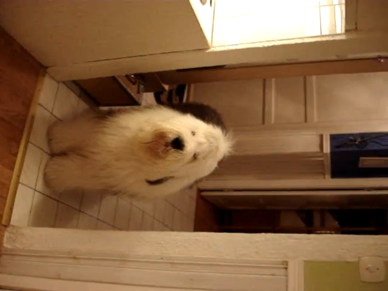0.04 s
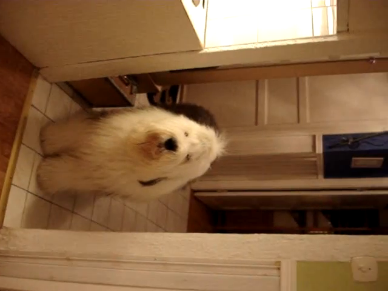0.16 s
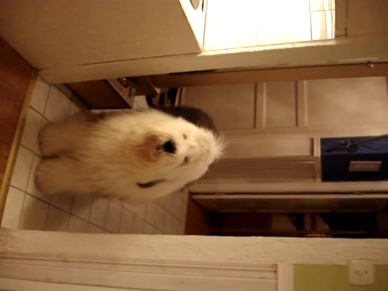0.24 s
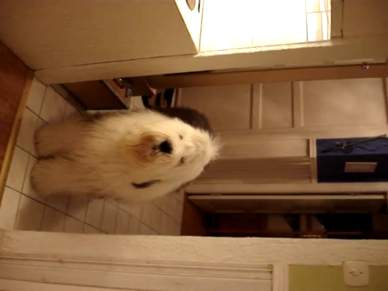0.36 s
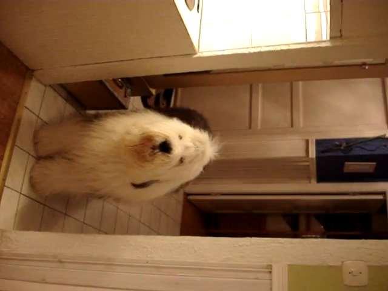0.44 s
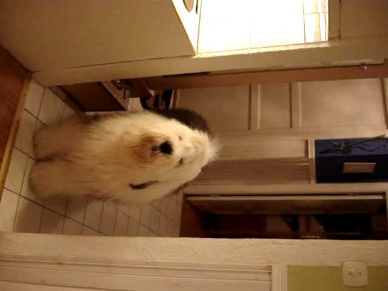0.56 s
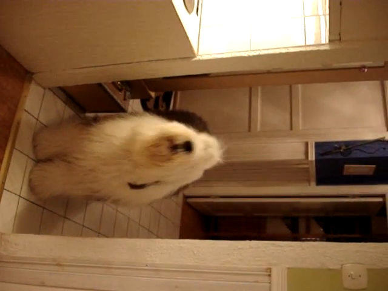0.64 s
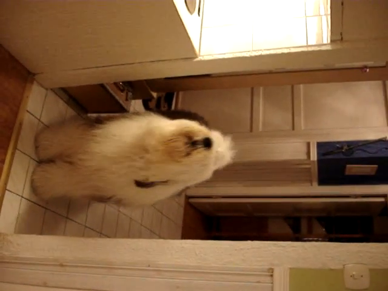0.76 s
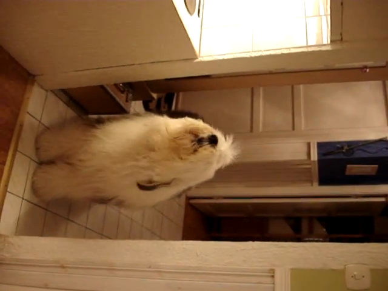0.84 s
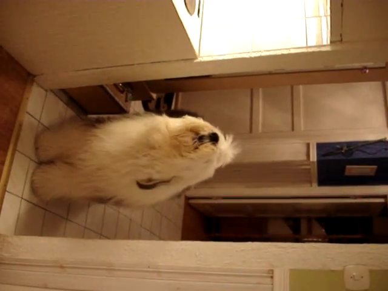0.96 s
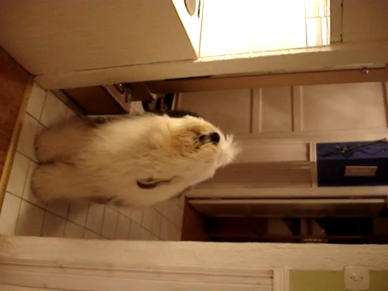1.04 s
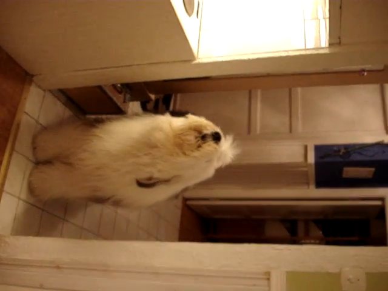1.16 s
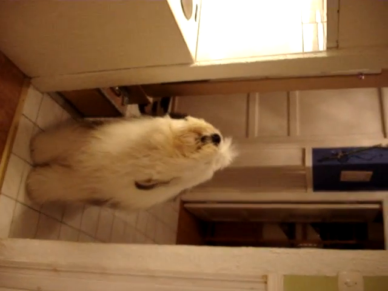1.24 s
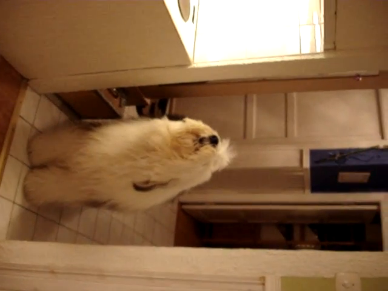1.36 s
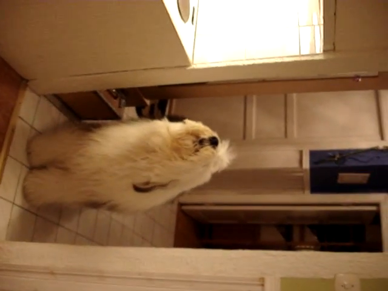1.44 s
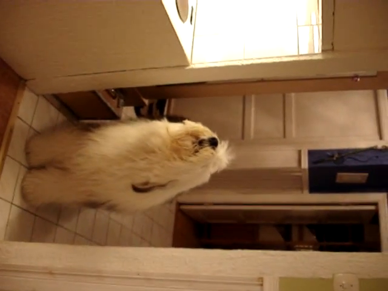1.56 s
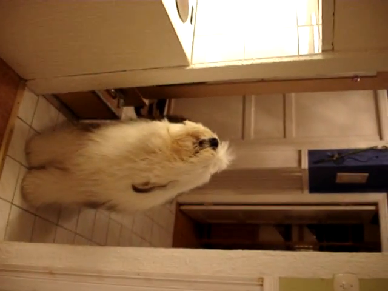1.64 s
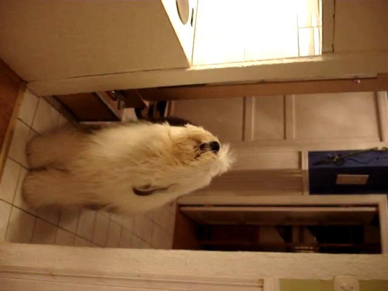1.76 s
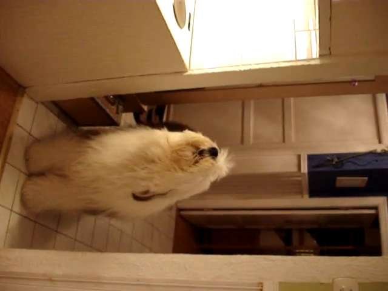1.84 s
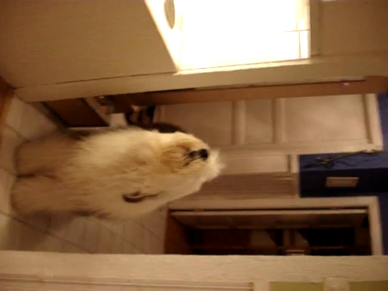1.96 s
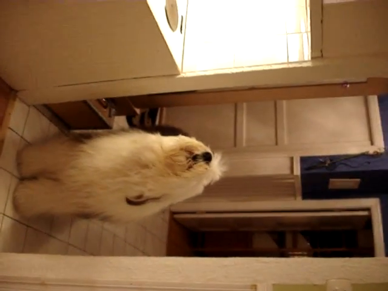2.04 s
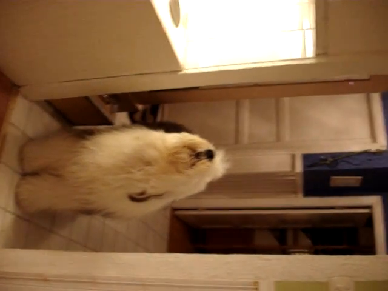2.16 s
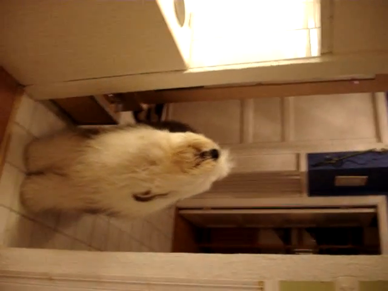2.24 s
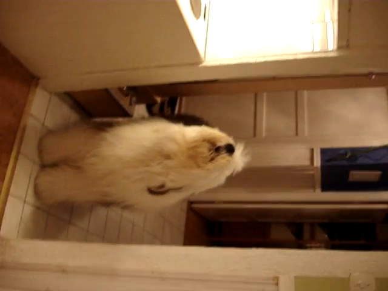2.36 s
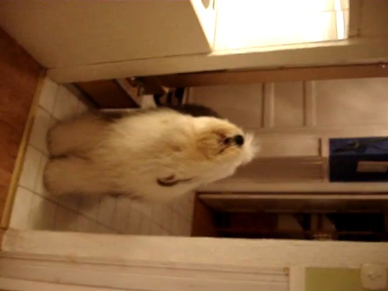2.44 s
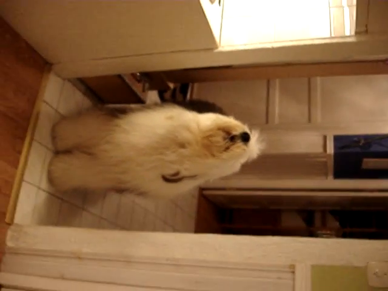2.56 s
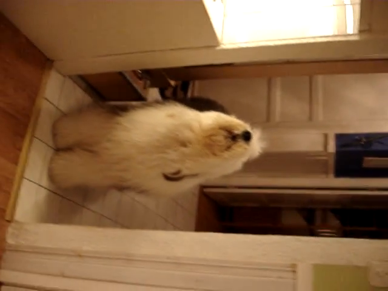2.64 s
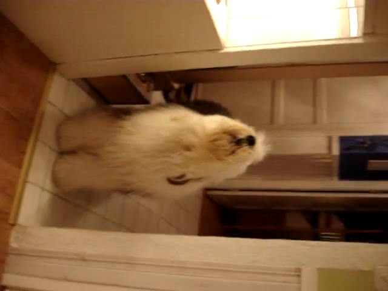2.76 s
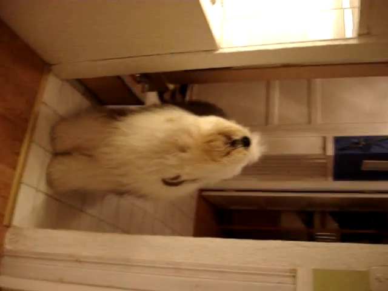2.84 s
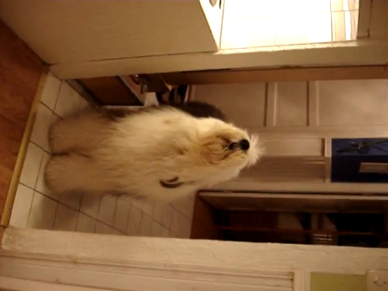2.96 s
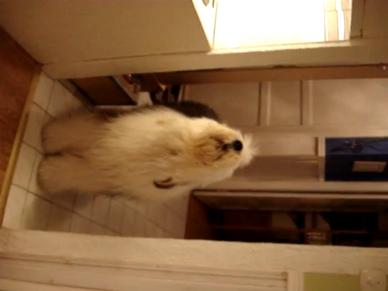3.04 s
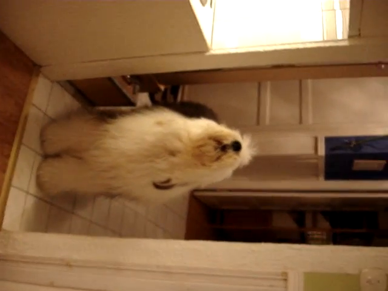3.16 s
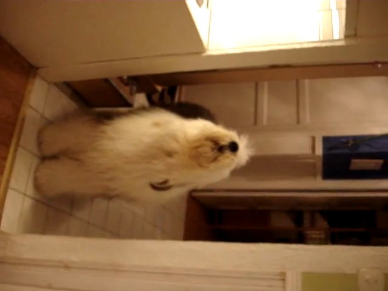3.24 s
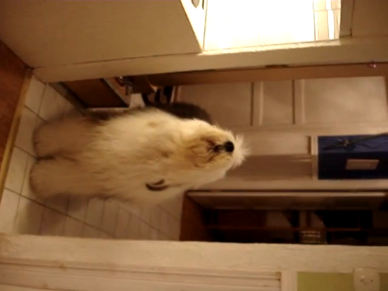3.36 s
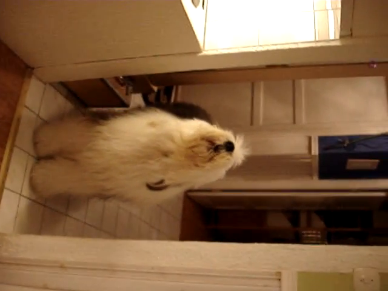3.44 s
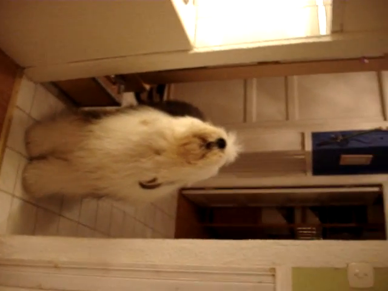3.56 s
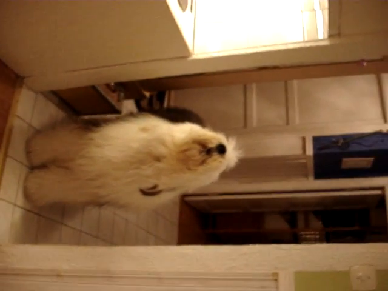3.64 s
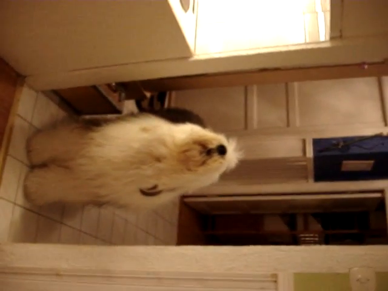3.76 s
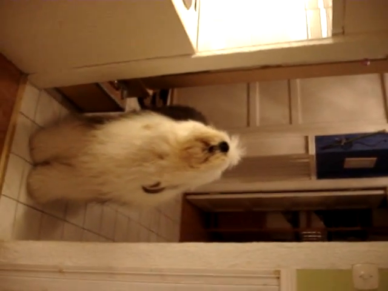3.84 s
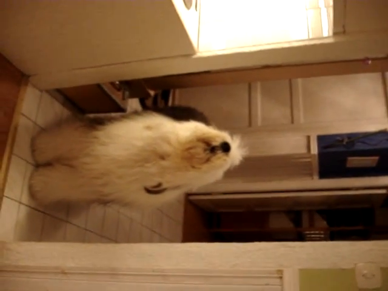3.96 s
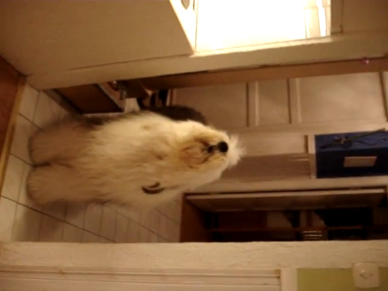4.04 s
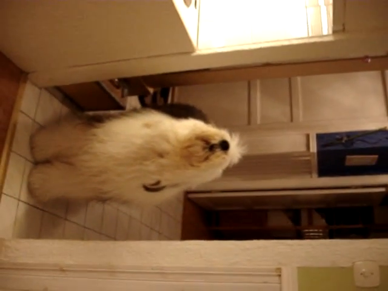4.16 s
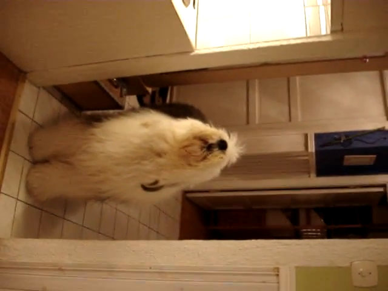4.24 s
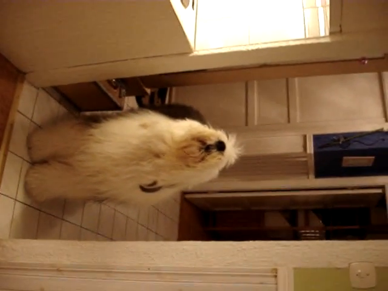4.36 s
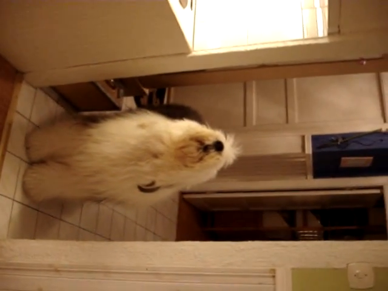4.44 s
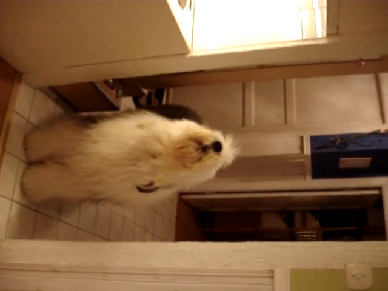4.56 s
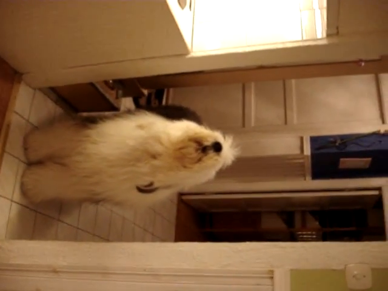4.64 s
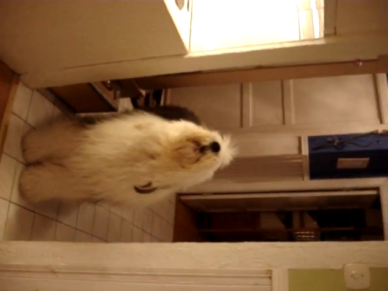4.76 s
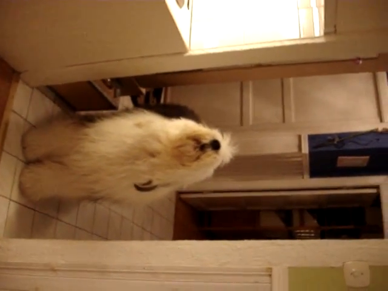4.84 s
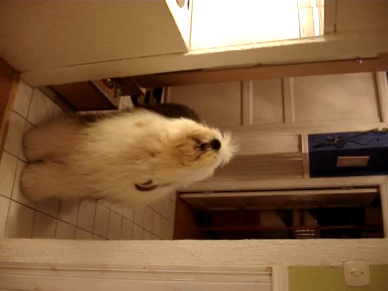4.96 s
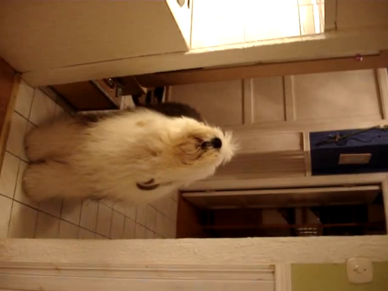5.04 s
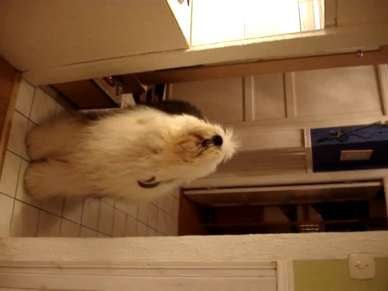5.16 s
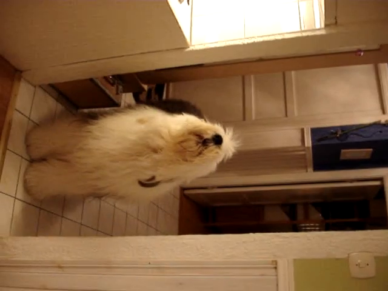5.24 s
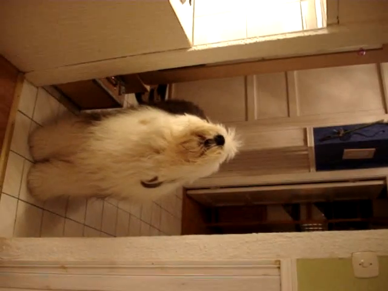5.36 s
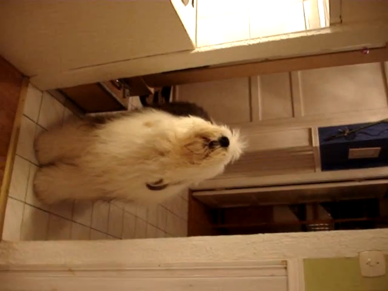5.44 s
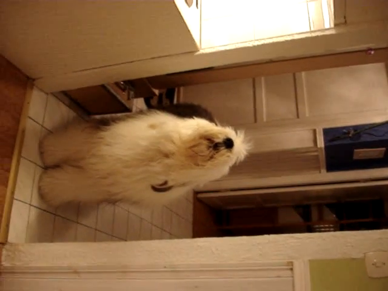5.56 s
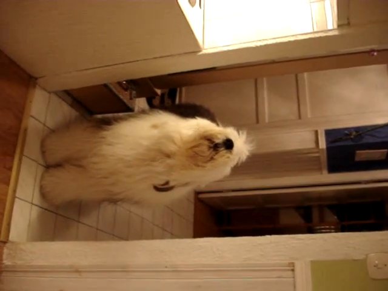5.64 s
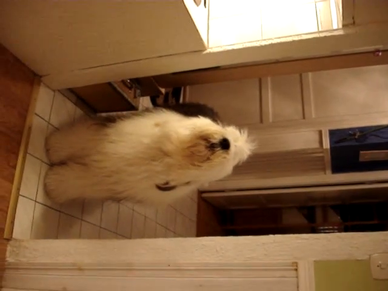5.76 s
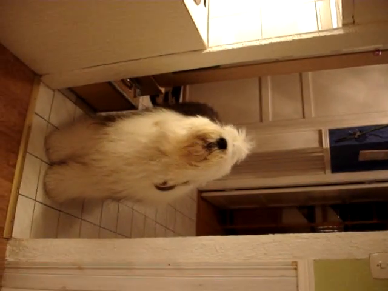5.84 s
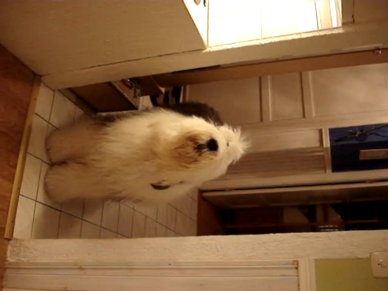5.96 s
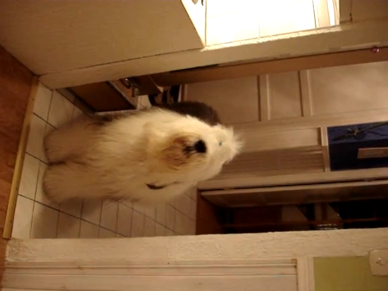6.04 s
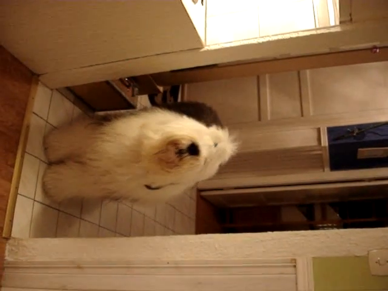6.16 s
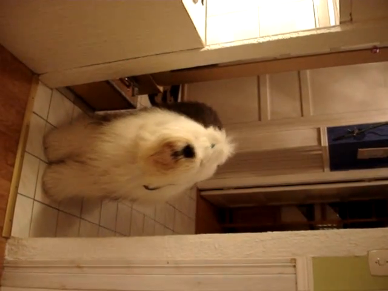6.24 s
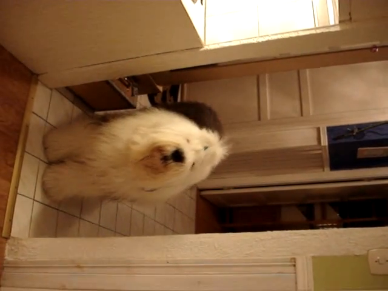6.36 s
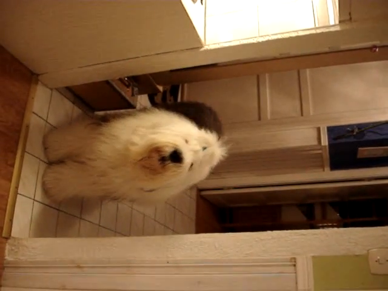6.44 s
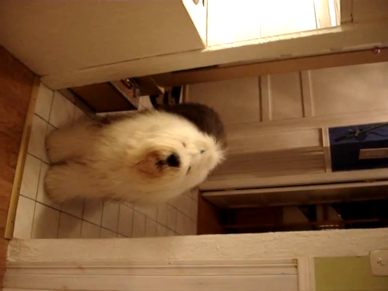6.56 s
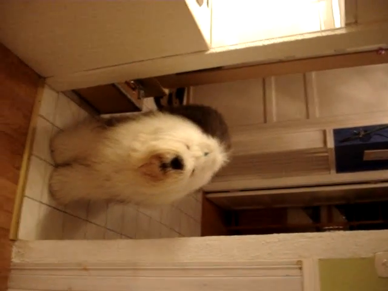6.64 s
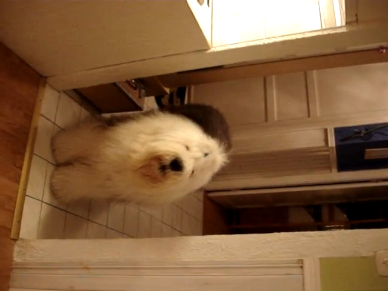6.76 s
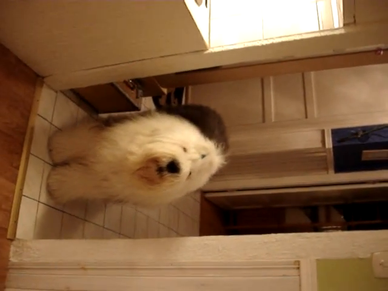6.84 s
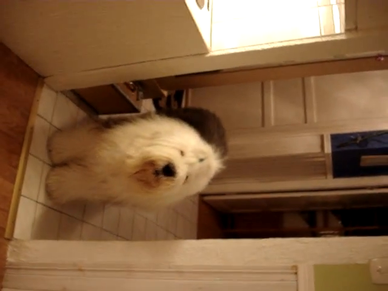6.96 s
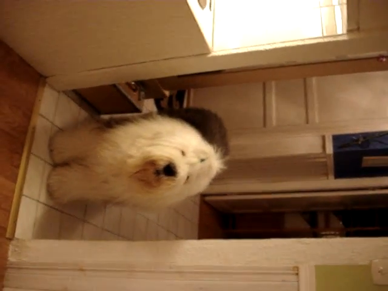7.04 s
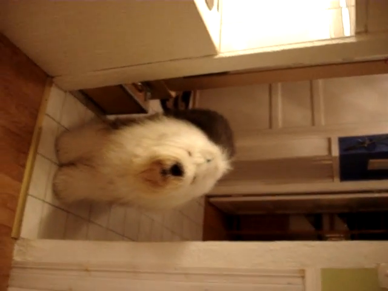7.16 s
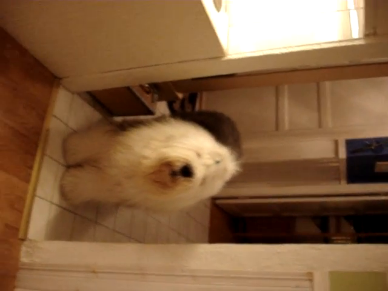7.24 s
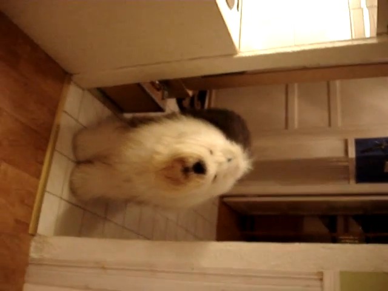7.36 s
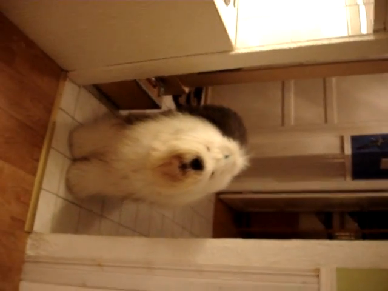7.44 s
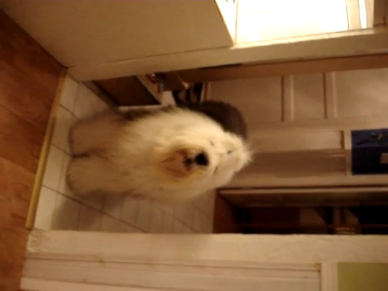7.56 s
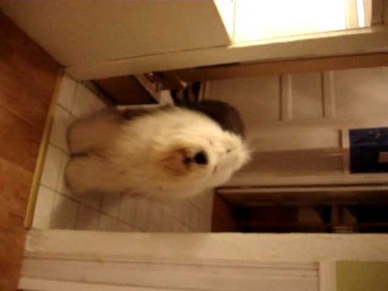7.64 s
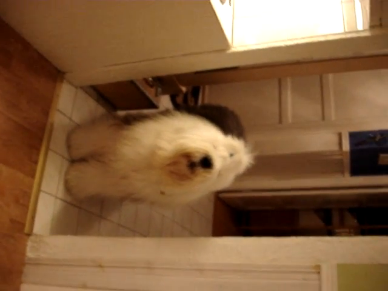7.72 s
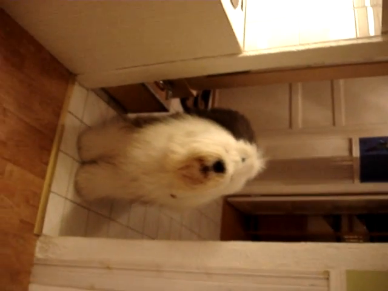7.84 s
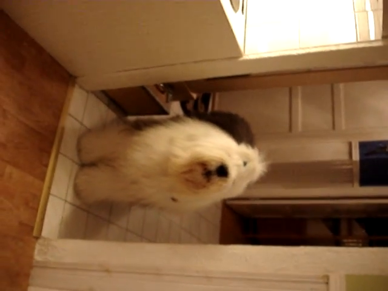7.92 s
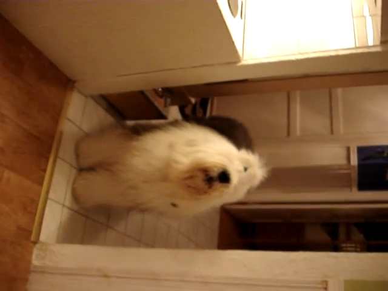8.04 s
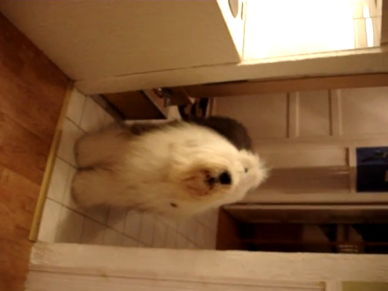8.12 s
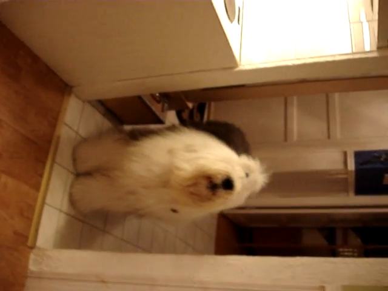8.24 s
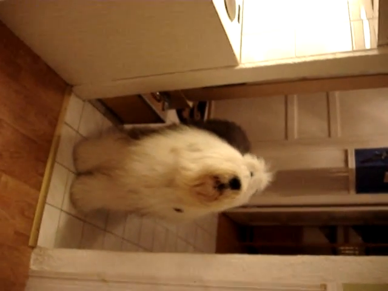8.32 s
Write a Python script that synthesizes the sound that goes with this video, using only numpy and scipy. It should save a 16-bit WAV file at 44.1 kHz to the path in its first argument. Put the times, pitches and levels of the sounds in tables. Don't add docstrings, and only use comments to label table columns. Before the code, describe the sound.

A large dog howls twice in a tiled hallway, first rough then clear and cracking, then wavering, sagging and holding until cut off.

```python
import sys
import numpy as np
from scipy import signal
from scipy.fft import rfft, irfft, next_fast_len
from scipy.io import wavfile
from scipy.ndimage import uniform_filter1d

SR = 44100
rng = np.random.default_rng(int(sys.argv[2]) if len(sys.argv) > 2 else 0)


def volts_from_db(level):
    exponent = np.asarray(level, float) / 20
    return 10 ** exponent


def digitize_waveform(pressure):
    field = np.atleast_2d(pressure).T
    bounded = np.clip(field, -1, 1)
    quanta = np.round(bounded * 32767).astype(np.int16)
    wavfile.write(sys.argv[1], SR, quanta)


N = 369999
LOCK_S, UNLOCK_S, LOCK_RATIO = 3.86, 6, 3 / 4
LOCK_TAKES_S = .04

# (f/Hz, width/Hz, level/dB)
THROAT = [(292, 31, -3.5), (556, 176, 1.5), (999.7, 121, -9.5), (1485, 98, -19), (1615.5, 64, -14),
          (2336, 124, -22.5), (3700, 43, -41.5), (3960, 75, -52), (4680, 150, -38), (5700, 370, -48.5),
          (6280, 290, -39), (8500, 250, -57), (9500, 200, -68)]


def dog():
    # (t/s, pitch f/Hz, effort level/dB, mouth opening level/dB)
    rough_howl = [(.735, 291.4, -37, 9.5), (.785, 311.6, -17.5, 7), (.84, 345, -15.5, -0.5),
                  (.9, 321.7, -15, 4), (1.12, 317, -14, 1.5), (1.35, 334.5, -16, 2), (2.1, 346.5, -15, 3.5),
                  (3.2, 337.8, -15.5, 1), (3.75, 334.6, -16, 2.5)]
    clear_howl = [(3.858, 324.8, -16.5, -4.5), (4.27, 326.5, -16, -3), (4.37, 323.7, -17.5, -3.5),
                  (4.502, 320.9, -17, -1), (4.881, 321.7, -14.5, -1), (5.27, 324.9, -17.5, -2),
                  (5.42, 318.3, -15.5, 0), (5.599, 322.8, -16.5, -4), (5.7, 328.5, -24.5, 5.5)]
    waver = [(6.625, 320.8, -49, -4), (6.644, 326.4, -13.5, 0.5), (6.691, 340.1, -12, 6),
             (6.728, 349.6, -9.5, 4.5), (6.787, 318, -14, -5), (6.849, 304.5, -14, 9),
             (6.925, 308, -13.5, 12.5)]
    sag = [(6.965, 366.1, -16.5, -10.5), (7.04, 340.6, -13, 4.5), (7.095, 324.3, -17, -3),
           (7.17, 305.2, -19.5, -12.5), (7.205, 293.7, -12, 6.5), (7.24, 296.4, -34.5, -1),
           (7.305, 294.9, -57.5, -3), (7.325, 307.2, -17.5, -10.5)]
    hold = [(7.35, 307.4, -20.5, 1.5), (7.39, 290.4, -7, -5.5), (7.461, 274.4, -12.5, -5),
            (7.52, 272.9, -13, 8), (7.6, 291.1, -6.5, -12), (7.67, 301.1, -11.5, -0.5),
            (7.96, 307.9, -13, 10), (8.241, 318.1, -11.5, -2)]
    break_off = [(8.32, 328.6, -12, 2), (8.36, 302, -16.5, -5.5), (8.39, 298.6, -14.5, -3)]
    cracks = [
        [(5.72, 398.6, -30, 29), (5.76, 421.7, -33, 5), (5.80, 396.3, -39.5, -12.5)],
        [(5.852, 299.7, -26.5, -13), (5.875, 274.4, -42, -0.5), (5.93, 251.3, -41.5, 2.5),
         (6.02, 237.4, -74.5, 0)],
    ]
    # (t/s, pitch f/Hz, own swing level/dB)
    second_fold = [
        [(.78, 285.3, -2.5), (1.0, 287.1, -11), (1.19, 277.4, -18), (1.35, 286.1, -0.5), (2.6, 286.7, 1.5),
         (2.9, 280.9, -17), (3.25, 275.8, -16), (3.7, 270.5, -14.5), (4.28, 244, -9)],
        [(8.3, 298, -7.5), (8.34, 275.4, -1), (8.38, 284, -3)],
    ]

    phrases = [rough_howl + clear_howl, waver + sag + hold + break_off] + cracks
    pitch, effort_db, mouth_db, gate = voiced(phrases, attack_s=.006, release_s=.03)
    pitch2, swing_db, gate2 = voiced(second_fold, attack_s=.03, release_s=.06)
    first_db, over_db, rasp_db, second_db = levels(pitch, effort_db, mouth_db, swing_db)
    _, octave2_db, sum_db, _ = second_db

    locked = (np.arange(N) > LOCK_S * SR) & (np.arange(N) < UNLOCK_S * SR)
    grip = uniform_filter1d(1. * locked, size=int(LOCK_TAKES_S * SR))
    coupling = gate2 * np.clip(volts_from_db(np.maximum(sum_db, octave2_db) + 17.5), 0, 1)
    free = coupling * uniform_filter1d(1. * ~locked, size=int(LOCK_TAKES_S * SR))

    glide_rounding_s = .035
    pitch = uniform_filter1d(pitch, size=int(glide_rounding_s * SR))
    glide_hz_per_s = np.gradient(pitch) * SR
    pitch = pitch + (.3 + .7 * free) * wobble(12)
    pitch2 = np.where(locked, LOCK_RATIO * pitch, pitch2 + .8 * wobble(12))
    one, two = 2 * np.pi * np.cumsum([pitch, pitch2], axis=1) / SR

    tones = fold_tones(one, two, first_db, second_db, gate2, free)
    tones += combination_tones(one, two, coupling, grip)
    over = volts_from_db(over_db) * overtones(one, two, coupling, glide_hz_per_s)
    return gate * (np.sqrt(2) * tones + over + volts_from_db(rasp_db) * rasp(one, coupling))


def voiced(tables, attack_s, release_s):
    t = np.arange(N) / SR
    s, *columns = np.transpose(sorted(tuple(row) for table in tables for row in table))
    edges = []
    for table in tables:
        opening = (t - table[0][0]) / attack_s
        closing = 1 + (table[-1][0] - t) / release_s
        edges.append(np.minimum(opening, closing))
    gate = np.clip(np.max(edges, axis=0), 0, 1)
    return [np.interp(t, s, c) for c in columns] + [gate]


def levels(pitch, effort_db, mouth_db, swing_db):
    # (from t/s, tone level/dB, octave level/dB, overtones level/dB, rasp level/dB)
    registers = [(0, -4.5, -4, -13, -3.5), (.88, -6.5, -15.5, -18, -11), (3.55, -6, -15, -14.5, -10.5),
                 (3.81, -0.5, -17, -13, -18), (3.95, -2, -14.5, -12.5, -25), (4.37, 2.5, -8.5, -9.5, -29.5),
                 (5.69, 4.5, -13, -14, -9), (5.83, 2, -7, -32, -21), (6.2, -1, -10, -16, -23),
                 (7.3, -0.5, -11.5, -19.5, -29), (7.62, -1, -8, -16, -29)]
    # (from t/s, tone level/dB, octave level/dB, sum tone level/dB, upper beat tone level/dB)
    second_registers = [
        (0, -1, -2.5, -5, -18.5),
        (.85, -4, -0.5, -8.5, -18),
        (3.81, -7.5, -35, -5.5, -6.5),
        (6.2, -8, -4.5, -21, -6),
    ]

    tone, octave, over, rasp_db = effort_db + register(registers)
    tone2, octave2, both, beat = effort_db + register(second_registers)
    free = np.clip((LOCK_S - np.arange(N) / SR) / LOCK_TAKES_S, 0, 1)
    sway_db, sway_hz = 2, 2.2
    sway = [sway_db * free * wobble(sway_hz) for k in range(6)]

    tone += detuned_db(pitch, 336.4, 150) + sway[0]
    octave += mouth_db + detuned_db(2 * pitch, 627.4, 68) + sway[1]
    over += 0.083 * mouth_db + sway[2]
    tone2 += swing_db
    octave2 += 0.3 * swing_db + sway[3]
    both += -0.32 * swing_db + sway[4]
    beat += 0.11 * swing_db + sway[5]
    return (tone, octave), over, rasp_db, (tone2, octave2, both, beat)


def register(rows):
    change_s = 0.036
    s, *columns = np.transpose(rows)
    held = np.array(columns)[:, np.searchsorted(s, np.arange(N) / SR, "right") - 1]
    return uniform_filter1d(held, size=int(change_s * SR), axis=1)


def detuned_db(hz, peak_hz, width_hz):
    return -10 * np.log10(1 + (2 * (hz - peak_hz) / width_hz) ** 2)


def fold_tones(one, two, first_db, second_db, gate2, free):
    tone_db, octave_db = first_db
    tone2_db, octave2_db, sum_db, beat_db = second_db
    shimmer = [volts_from_db((.15 + 1.3 * free) * wobble(25)) for k in range(3)]
    first = volts_from_db(tone_db) * np.cos(one) * shimmer[0] * tongue(1)
    first += volts_from_db(octave_db) * tongue(2) * np.cos(2 * one + 1.2)
    second = volts_from_db(tone2_db) * np.cos(two) + volts_from_db(octave2_db) * np.cos(2 * two) * shimmer[1]
    second += volts_from_db(sum_db) * np.cos(one + two) * shimmer[2] + volts_from_db(beat_db) * np.cos(2 * one - two)
    return first + gate2 * second


def combination_tones(one, two, coupling, grip):
    multiples = [(4, -2), (4, -1), (0, 4), (-2, 5), (-1, 2), (-2, 4), (3, -2), (-1, 3), (0, 3), (1, 2),
                 (3, -1), (2, 1), (1, 3), (2, 2), (3, 1)]
    # (free level/dB, locked level/dB)
    combination_db = [(-46.5, -57), (-42.5, -60), (-46, -74.5), (-54.5, -77.5), (-48, -89), (-35.5, -89.5),
                      (-33.5, -58.5), (-34, -94.5), (-37.5, -60), (-39, -67), (-45, -33.5), (-63.5, -42),
                      (-47.5, -27), (-72, -37), (-62.5, -43.5)]
    tones = np.zeros(N)
    for (m, n), (free_db, locked_db) in zip(multiples, combination_db):
        level_db = grip * locked_db + (1 - grip) * (free_db + 3 * wobble(8.2))
        tones += coupling * volts_from_db(level_db) * np.cos(m * one + n * two + m * n)
    return tones


def tongue(partial):
    # (middle t/s, length/s, partial number, level/dB)
    tongue_shifts = [(5.03, .06, 2, -12.5), (5.44, 0.14, 3, -23.5), (5.63, 0.037, 2, -4.5),
                     (7.49, 0.036, 1, -13), (7.5, 0.12, 4, 9.5), (8.2, 0.22, 5, 6), (6.88, 0.1, 4, 1.5),
                     (0.83, 0.098, 3, 15), (0.71, .07, 5, 10.5), (0.82, .05, 7, 9.5), (5.0, 1.6, 6, -12),
                     (7.2, 0.5, 7, -11.5), (5.6, .5, 20, -13), (3.9, 2, 11, 8)]
    t = np.arange(N) / SR
    return volts_from_db(sum(db * np.exp(-(2 * (t - s) / length) ** 4)
                   for s, length, k, db in tongue_shifts if round(k) == partial))


def overtones(one, two, coupling, glide_hz_per_s):
    # (f/Hz, width/Hz, level/dB)
    open_mouth = [(1080, 95, -11.5), (1266, 100, -17), (944, 160, -18.5), (1589.3, 110, -16),
                  (2385, 95, -25.5)]
    mouth_opens_s, flicker_db, upper_db = 6.2, 2, -4
    timing = one + .3 * coupling * np.sin(two)
    weight = np.exp(0.11 * coupling * np.cos(two))
    flicker = [volts_from_db(flicker_db * wobble(3.7)) for k in range(7)]
    pulses = np.zeros(N)
    for k in range(3, 26):
        unsteady = flicker[k % 7] ** (3 if k > 8 else 1)
        pulses += np.cos(k * timing) * unsteady * tongue(k)
    pulses *= weight

    first_howl = np.arange(N) < mouth_opens_s * SR
    mouth = np.where(first_howl, throat(pulses, THROAT[2:6]), throat(pulses, open_mouth))
    steady = 1 / (1 + (glide_hz_per_s / 60) ** 2)
    return evened(mouth + volts_from_db(upper_db) * steady * throat(pulses, THROAT[6:]), over_s=0.65)


def rasp(one, coupling):
    # (f/Hz, width/Hz, level/dB)
    rasp_bands = [(3550, 190, -39.5), (4360, 120, -36.5), (4720, 260, -36.5), (5910, 450, -44),
                  (6700, 88, -48), (7775, 170, -43), (10000, 150, -58)]
    puffs = rng.standard_normal(N) * (1.8 + np.cos(one))
    rough = throat(puffs, THROAT[:2]) * (0.35 + 0.12 * coupling) + throat(puffs, THROAT[2:6])
    below_cavities = signal.butter(4, 2700, fs=SR, output="sos")
    rough = signal.sosfilt(below_cavities, rough) + throat(puffs, rasp_bands)
    airy = (1 - coupling) * throat(puffs, [(1740, 600, -20.5)])
    return rms_one(rough + airy)


def throat(x, modes):
    return sum(volts_from_db(db) * resonance(resonance(x, hz, width), hz, width) for hz, width, db in modes)


def resonance(x, hz, width_hz):
    r = np.exp(-np.pi * width_hz / SR)
    poles = [1, -2 * r * np.cos(2 * np.pi * hz / SR), r * r]
    return signal.lfilter([(1 - r * r) / 2, 0, (r * r - 1) / 2], poles, x)


def evened(x, over_s):
    return x / np.sqrt(uniform_filter1d(x ** 2, size=int(over_s * SR)) + 1e-12)


def rms_one(x):
    return x / np.sqrt(np.mean(x ** 2) + 1e-20)


def wobble(rate_hz):
    r = np.exp(-64 * np.pi * rate_hz / SR)
    settle = 1400
    noise = rng.standard_normal(N // 32 + settle + 2)
    slow = signal.lfilter([1], [1, -2 * r, r * r], noise)[settle:]
    return np.interp(np.arange(N) / 32, np.arange(len(slow)), rms_one(slow))


def breaths():
    # (start t/s, end t/s, centre f/Hz, width/Hz, level/dB)
    breath_events = [
        (0.78, 1.5, 890, 1400, -53),
        (5.42, 5.749, 4370, 2001, -55.5),
        (6.745, 6.869, 4800, 13000, -44.5),
        (6.922, 7.3, 5560, 1700, -50.5),
        (6.63, 7.28, 1455, 1170, -44.5),
        (8.278, 8.42, 470, 330, -20.5),
        (0.75, 0.9, 239, 71, -26),
    ]
    out, unsteady_db = np.zeros(N + SR), 1.5 * wobble(30)
    for start, end, hz, width, db in breath_events:
        i, length = int(start * SR), int((end - start) * SR)
        swell = np.sin(np.pi * (np.arange(length) / length) ** .9)
        band = resonance(resonance(rng.standard_normal(SR)[:length], hz, width), hz, width)
        out[i:i + length] += volts_from_db(db) * swell * rms_one(band)
    return volts_from_db(unsteady_db) * out[:N]


def hallway(x):
    hall_db, t60_s, dull_hz = -7, .55, 3000
    size = next_fast_len(N + SR)
    hz = np.arange(size // 2 + 1) * SR / size
    t60 = t60_s / (1 + hz / dull_hz)
    lags_s = .0213 * 1.0917 ** np.arange(12)
    loops = [volts_from_db(-60 * lag / t60) * np.exp(-2j * np.pi * hz * lag) for lag in lags_s]
    response = sum((-1) ** k * loop / (1 - loop) for k, loop in enumerate(loops)) / np.sqrt(len(lags_s))
    return volts_from_db(hall_db) * irfft(rfft(x, size) * response, size)[:N]


def overloads():
    overload_times = [0.8328, .893, .917, .956, 1.0402, 1.1003, 1.1382, 1.2142, 1.2622, 1.442, 1.5066, 1.65,
                      1.723, 1.782, 1.8347, 2.232, 2.388, 2.486, 2.5308, 2.8028, 2.977, 3.1523, 3.1834,
                      3.277, 3.5634, 3.9143, 6.6614, 6.7357, 7.023, 8.3472]
    level_db, spread_db = -16.5, 1.5
    clicks = np.zeros(N)
    at = (np.array(overload_times) * SR).astype(int)
    clicks[at] = volts_from_db(level_db + spread_db * rng.standard_normal(len(at)))
    return resonance(resonance(clicks + 1e-18, 3000, 2500), 3000, 2500)


def ticks():
    # (t/s, centre f/Hz, level/dB)
    tick_events = [
        (0.128, 1610, -57),
        (0.212, 6060, -62),
        (0.354, 4700, -55),
        (0.569, 6000, -81),
        (5.909, 5860, -62),
        (6.131, 6014, -57.5),
        (6.353, 3000, -57),
        (6.576, 6360, -54.5),
    ]
    t, out = np.arange(SR // 4) / SR, np.zeros(N + SR)
    for s, hz, db in tick_events:
        decay = volts_from_db(db - 60 * t / 0.13)
        burst = rms_one(resonance(rng.standard_normal(len(t)), hz, 0.27 * hz)) * decay
        out[int(s * SR):int(s * SR) + len(t)] += burst
    return out[:N]


def background():
    # (f/Hz, level/dB)
    hiss_spectrum = [(12, -63), (20, -16), (164, -12.5), (202, 2), (229, -11), (322, -5), (1410, -16.5),
                     (1690, -15), (6200, -22), (7830, -34), (9890, -10.5), (12900, -53), (21800, -120)]
    # (f/Hz, width/Hz, level/dB)
    hums = [
        (226, 7.2, -72.5),
        (343, 8, -79),
        (7520, 740, -67.5),
    ]
    hiss_db = -56.5
    hz = np.maximum(np.arange(N // 2 + 1) * SR / N, 1)
    shape_hz, shape_db = np.transpose(hiss_spectrum)
    shape = volts_from_db(np.interp(np.log(hz), np.log(shape_hz), shape_db))
    out = volts_from_db(hiss_db) * rms_one(irfft(rfft(rng.standard_normal(N)) * shape, N))
    for f, width, db in hums:
        out += volts_from_db(db) * rms_one(resonance(rng.standard_normal(N), f, width))
    return out


def scene():
    voice = dog() + breaths()
    return (voice + hallway(voice) + ticks() + background() + overloads())[None]


def roll_off(x):
    return signal.sosfilt(signal.butter(12, 10040, fs=SR, output="sos"), x)


def record(dry):
    thin = signal.sosfilt(signal.butter(2, 130, "high", fs=SR, output="sos"), dry)
    clip_low, softness = -.45, .06
    at_rest = np.logaddexp(0, -clip_low / softness)
    clipped = softness * (np.logaddexp(0, (thin - clip_low) / softness) - at_rest)
    centred = signal.sosfilt(signal.butter(4, 160, "high", fs=SR, output="sos"), np.tanh(clipped))
    rumble_db, rumble_hz = -40, 200
    loudness = np.sqrt(uniform_filter1d(dry ** 2, size=4000) + 6e-4)
    low = signal.butter(2, rumble_hz, fs=SR, output="sos")
    rumble = rms_one(signal.sosfilt(low, rng.standard_normal(N)))
    top_cut = signal.cheby2(12, 60, 10000 * 1.07, fs=SR, output="sos")
    return roll_off(signal.sosfilt(top_cut, centred + volts_from_db(rumble_db) * loudness * rumble))


dry = scene()
out = record(dry)
digitize_waveform(out)
```